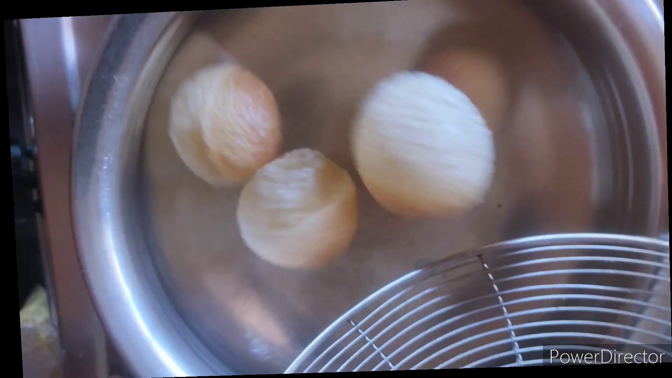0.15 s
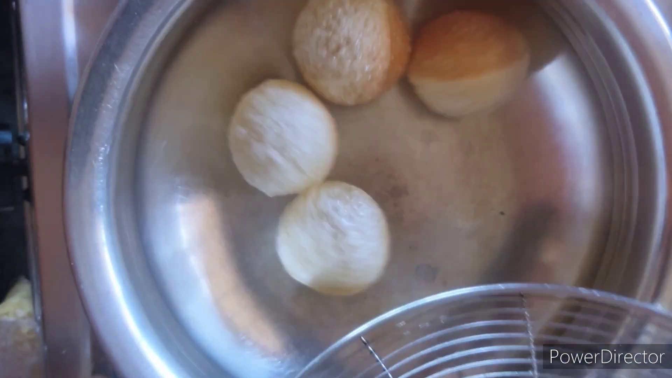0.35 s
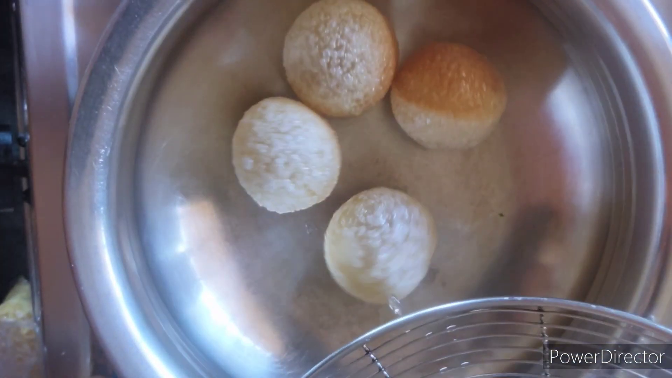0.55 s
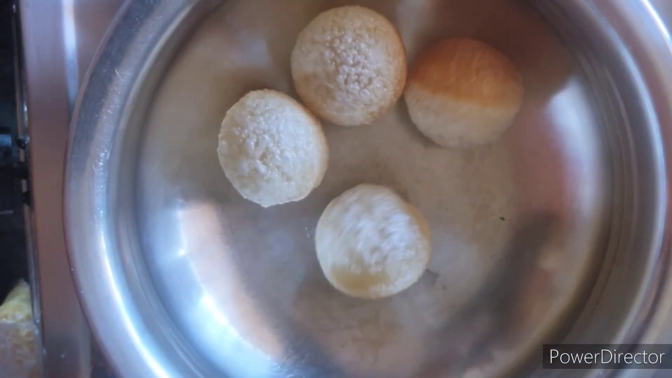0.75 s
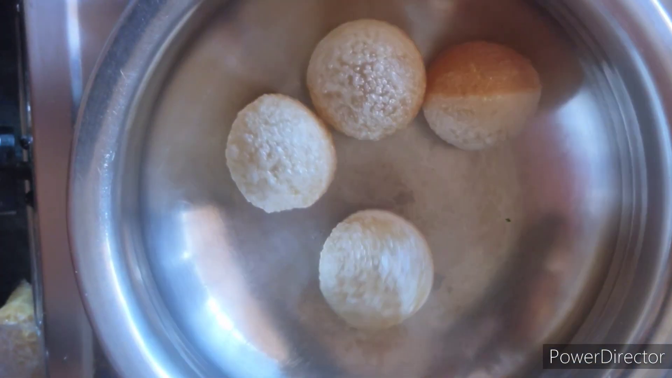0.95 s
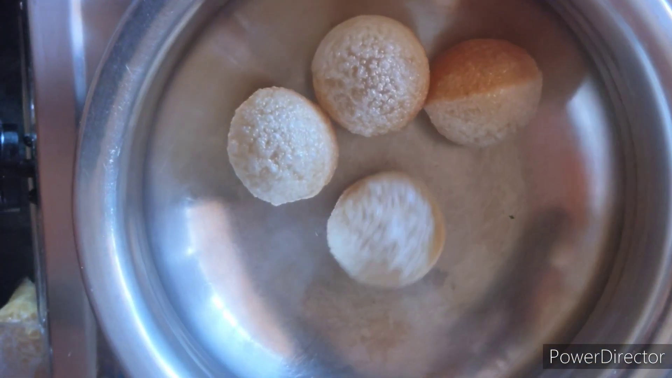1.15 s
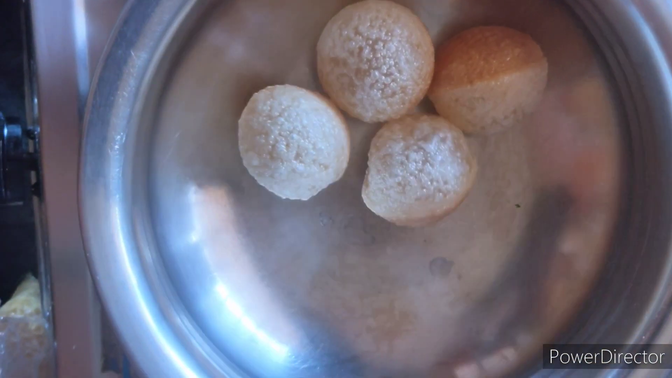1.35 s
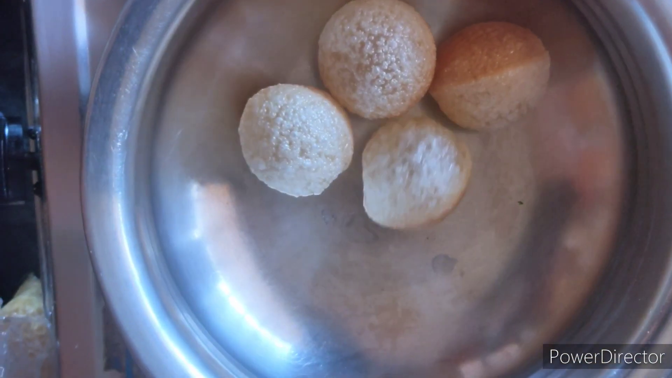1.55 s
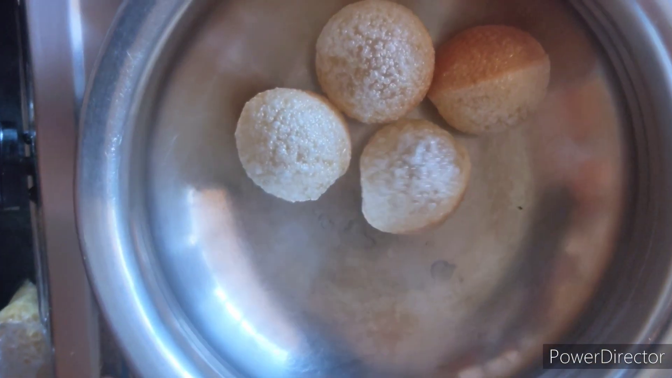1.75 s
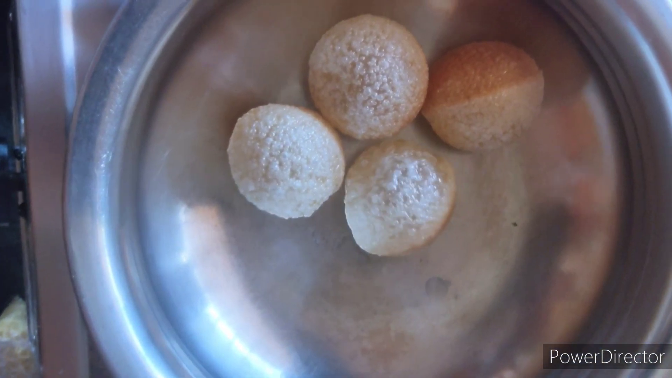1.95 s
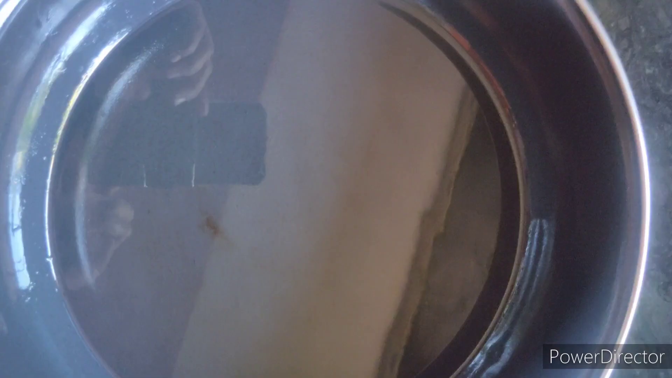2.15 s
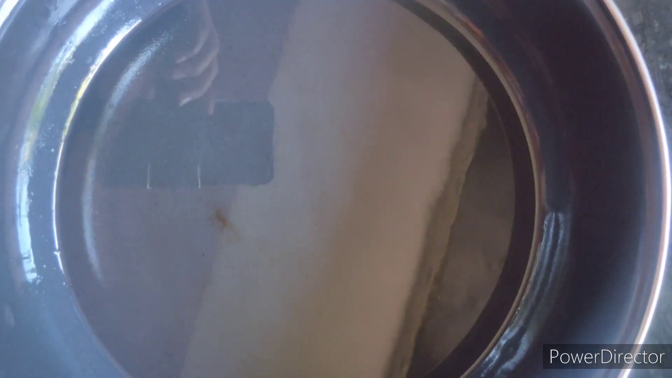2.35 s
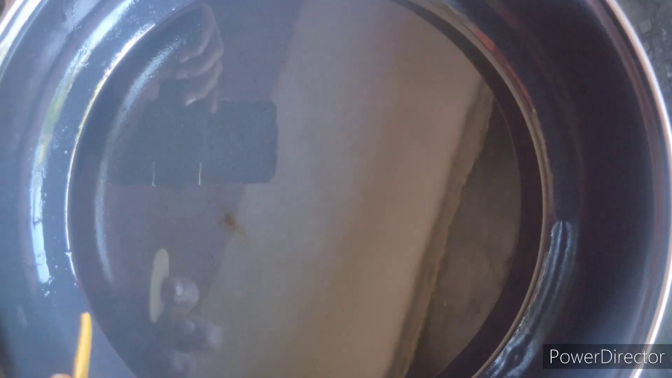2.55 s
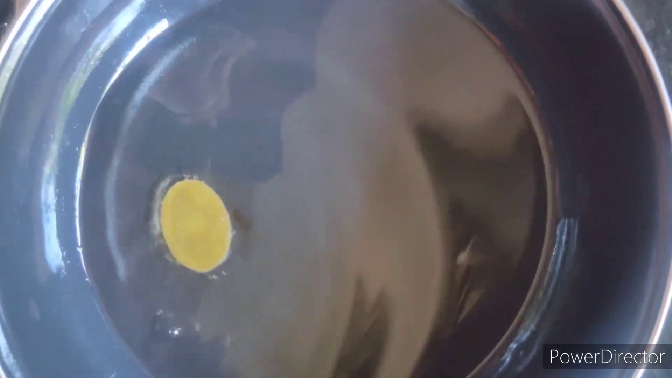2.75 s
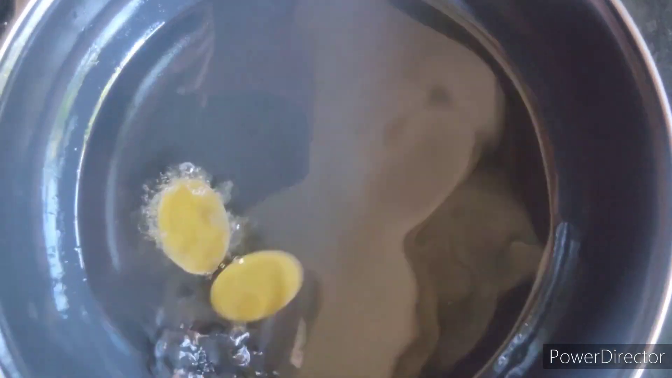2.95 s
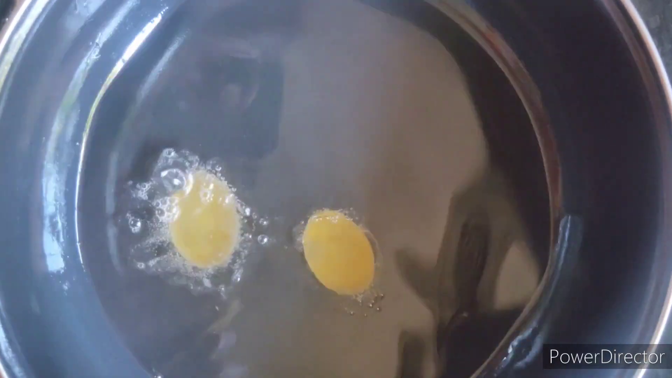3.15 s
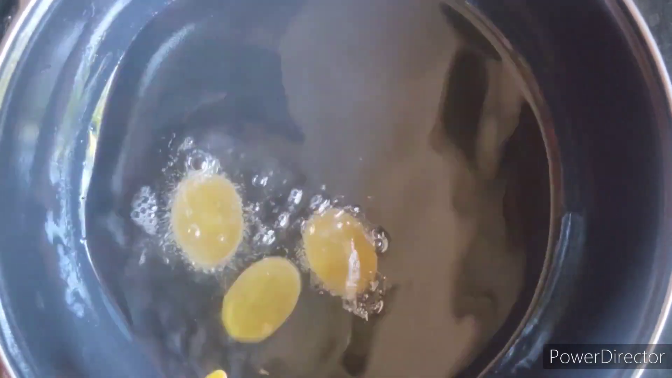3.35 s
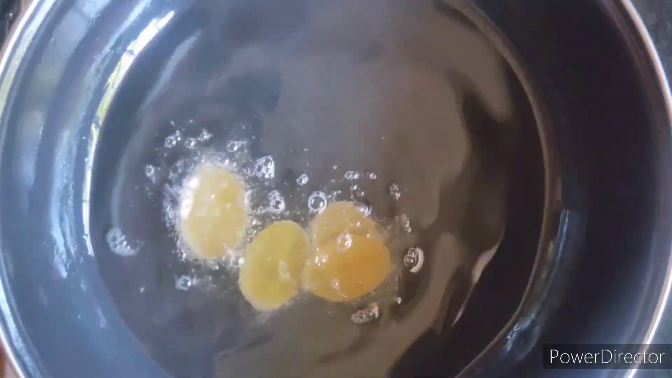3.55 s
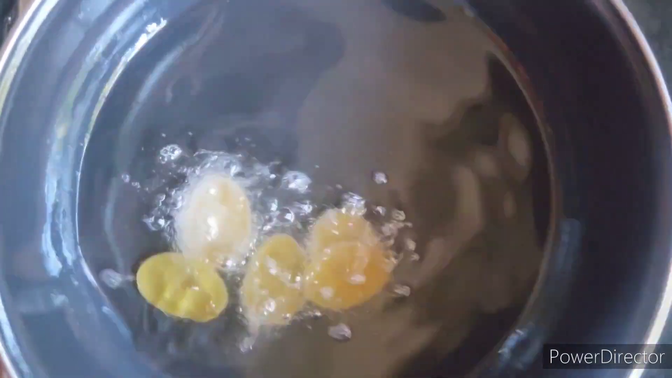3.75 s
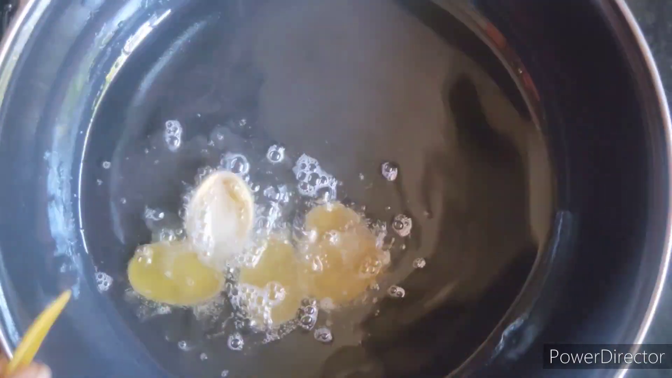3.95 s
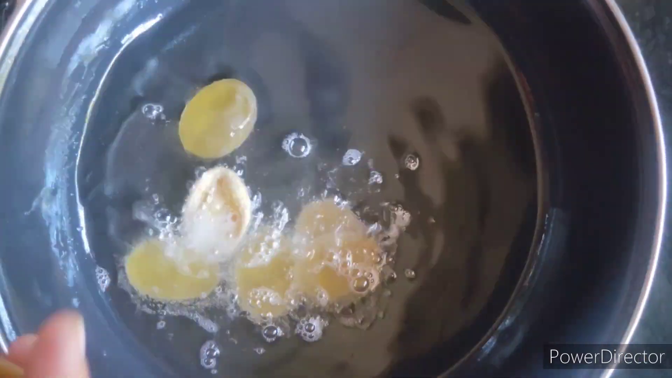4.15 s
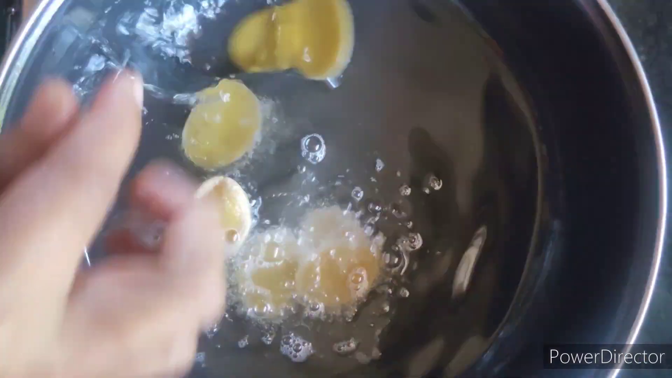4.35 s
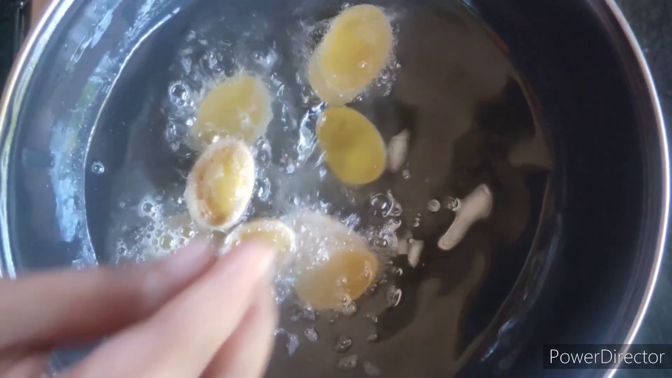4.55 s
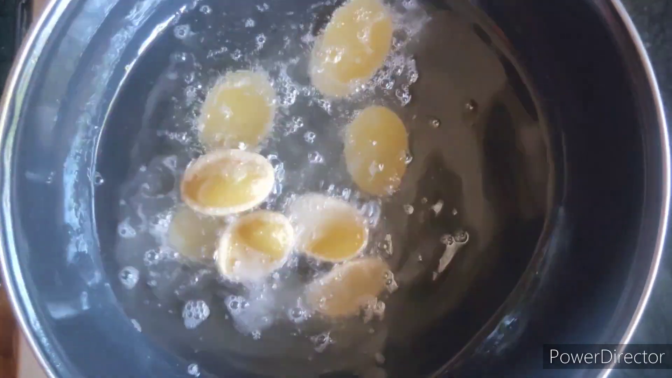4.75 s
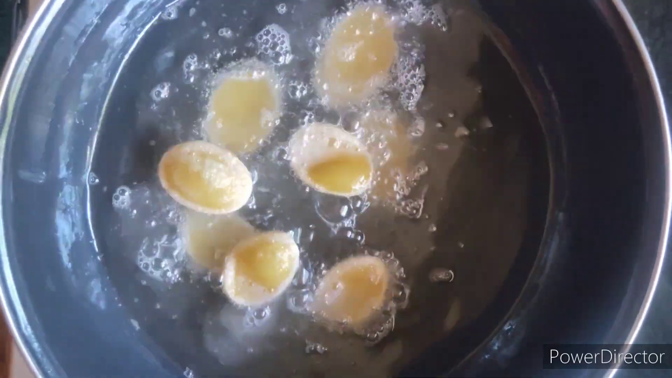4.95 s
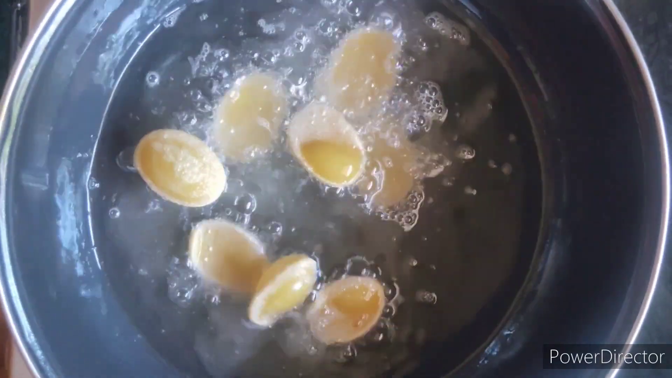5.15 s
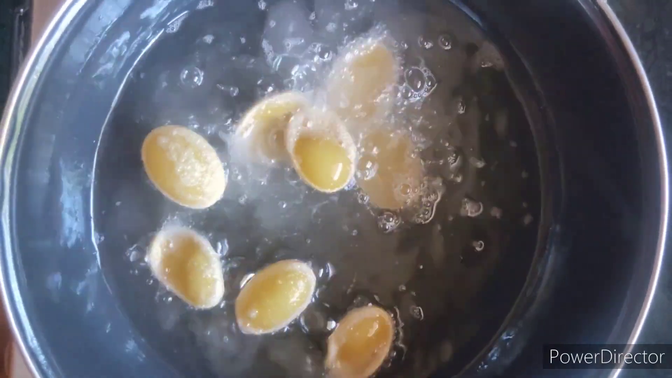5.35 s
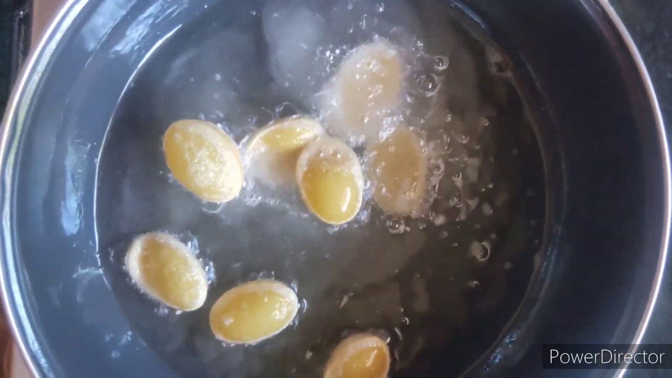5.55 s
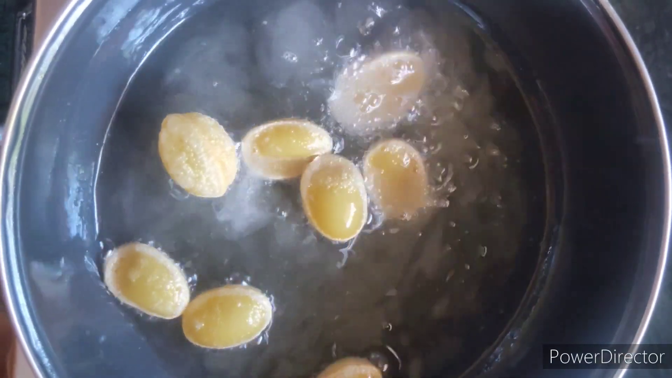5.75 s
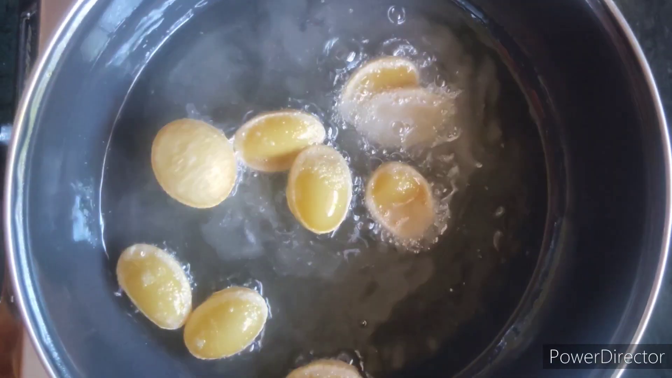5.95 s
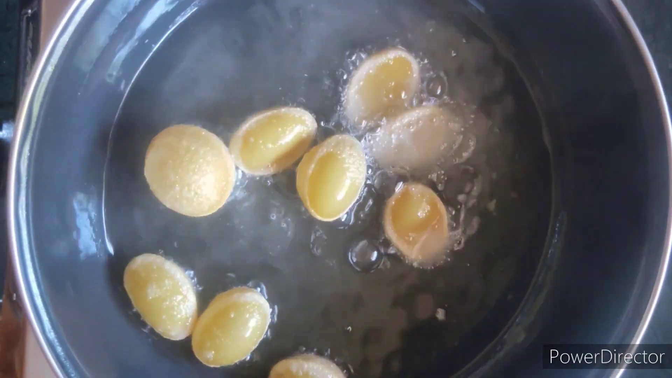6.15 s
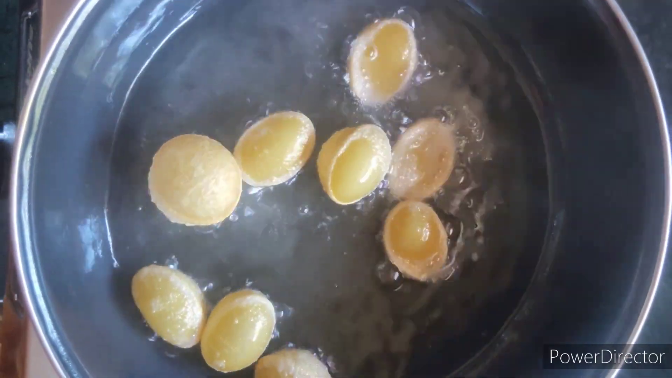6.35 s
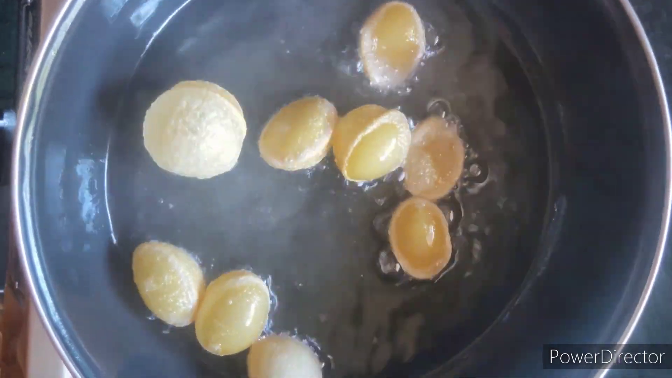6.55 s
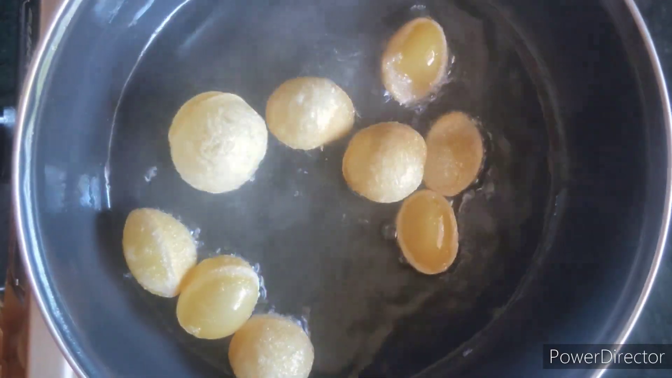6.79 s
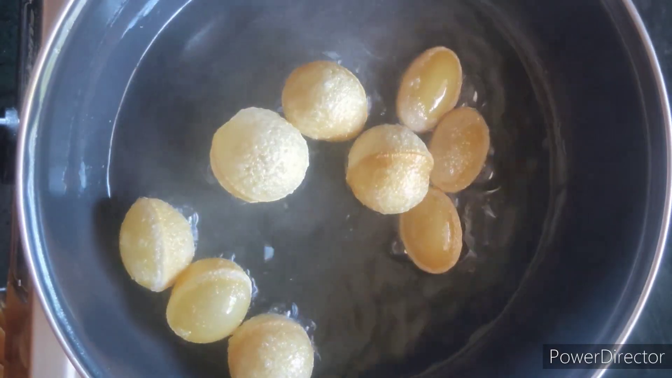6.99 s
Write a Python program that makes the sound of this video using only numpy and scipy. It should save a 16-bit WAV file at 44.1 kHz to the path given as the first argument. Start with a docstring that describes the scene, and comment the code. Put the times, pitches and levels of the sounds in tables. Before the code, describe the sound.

First, half a second of dull knocks and rattling as fried puffs roll into a metal bowl, fading to soft taps and faint tones. Then the scene cuts to a pot of oil: sharp splashes with short metallic ring, hiss and sparse spits, thickening into rapid loud crackles with a few soft low thumps. A bird outside chirps faintly about three times a second. Close kitchen pickup, faint noise floor.

```python
"""Two kitchen scenes one after the other. First crisp puffs tumble from a wire strainer into a steel bowl, heard dull:
knocks set the bowl ringing over rattling noise and a low rumble, then soft nudges and faint tones follow as noise patches.
Next a small bird, a gliding tone smeared by echoes, starts chirping outside at an even pace, and dough discs drop
into hot oil with bursts of noise and a ringing pot. The oil hisses and spits, and its loud crackles come ever more
densely. Soft low thumps join in later; a faint floor of noise runs throughout."""
import sys
import numpy as np
from scipy import signal
from scipy.fft import rfft, irfft
from scipy.io import wavfile
from scipy.ndimage import uniform_filter1d

SR = 44100
rng = np.random.default_rng(int(sys.argv[2]) if len(sys.argv) > 2 else 0)


def dump_mix(stems):
    """Bounce the given channels to the path in sys.argv[1] as a 16-bit WAV at rate SR."""
    frames = np.atleast_2d(stems).T  # one column per channel
    limited = np.clip(frames, -1, 1)  # hard clip at full scale
    pcm = np.round(limited * 32767).astype(np.int16)
    wavfile.write(sys.argv[1], SR, pcm)


N = 309582   # length of the sound [samples]
RIM_FROM_HZ = 1500   # bowl modes above this belong to the rim, the others to the bottom


def from_db(db):
    """Turn decibels into a gain."""
    return 10 ** (np.asarray(db) / 20)


def rms_one(x):
    """Scale a sound to an rms of 1."""
    return x / np.sqrt(np.mean(x ** 2) + 1e-20)


def in_time(rows):
    """Draw each curve of a table, sample by sample."""
    s, *columns = np.transpose(rows)
    return [np.interp(np.arange(N) / SR, s, c) for c in columns]


def at_hz(points, hz):
    """Read a spectrum at a pitch, on a log pitch axis."""
    point_hz, point_db = np.array(points)[:, 0], np.array(points)[:, 1]
    return np.interp(np.log(hz), np.log(point_hz), point_db)


def drift(rate):
    """Slow random wandering of rms 1, from noise low-passed near rate [Hz]."""
    r = np.exp(-80 * np.pi * rate / SR)   # one step spans 40 samples
    white = rng.standard_normal(N // 40 + 2002)
    slow = signal.lfilter([1], [1, -2 * r, r * r], white)[2000:]
    return np.interp(np.arange(N) / 40, np.arange(len(slow)), rms_one(slow))


def ring(clicks, hz, t60):
    """A resonance: each unit click starts a dying sine of height 1, down 60 dB after t60 [s]."""
    r, w = from_db(-60 / (t60 * SR)), 2 * np.pi * hz / SR
    return signal.lfilter([0, np.sin(w)], [1, -2 * r * np.cos(w), r * r], clicks + 1e-18)


def band(x, low, high, order=2):
    """Keep the pitches between low and high [Hz]."""
    edges = [max(low, 10), min(high, .45 * SR)]
    return signal.sosfilt(signal.butter(order, edges, "band", fs=SR, output="sos"), x)


def coloured(spectrum):
    """Steady noise of a given spectrum, rms 1."""
    hz = np.maximum(np.arange(N // 2 + 1) * SR / N, 10)
    return rms_one(irfft(rfft(rng.standard_normal(N)) * from_db(at_hz(spectrum, hz)), N))


def dying(length, rise, t60):
    """Envelope that swells over about rise [s] and falls 60 dB in t60 [s]."""
    t = np.arange(length) / SR
    return (1 - np.exp(-t / max(rise, 1e-4))) * from_db(-60 * t / max(t60, .003))


def add(out, s, sound):
    """Mix a sound in at s seconds."""
    i = round(s * SR)
    out[i:i + len(sound)] += sound[:N - i]


def patches(rows):
    """Narrow noise patches that swell and die: (time [s], level [dB], centre [Hz], width [Hz], rise [s], t60 [s])."""
    out = np.zeros(N)
    for s, db, hz, width_hz, rise, t60 in rows:
        patch = band(rng.standard_normal(SR), hz - width_hz / 2, hz + width_hz / 2, order=3)
        add(out, s, from_db(db) * rms_one(patch) * dying(SR, rise, t60))
    return out


def bursts(rows, snap_db, snap_t60, spray_db):
    """A sharp snap of noise, then a spray that dies sooner in the treble; three bands each."""
    out, length = np.zeros(N), SR // 5
    # (low [Hz], high [Hz], factor on every t60)
    layers = [(1166, 2260, 1.84), (2700, 5790, 0.8), (7900, 15200, 0.83)]
    white = rng.standard_normal((len(rows), length))
    white[:, 0] = 5   # the burst opens with one hard front
    noises = [rms_one(band(white, low, high, order=3)) for low, high, share in layers]
    for k, (s, db, *colour_db, t60) in enumerate(rows):
        for noise, rel_db, (low, high, share) in zip(noises, colour_db, layers):
            snap = from_db(snap_db) * dying(length, .0001, snap_t60 * share)
            spray = from_db(spray_db) * dying(length, 0.0049, t60 * share)
            add(out, s, from_db(db + rel_db) * noise[k] * (snap + spray))
    return out


def bowl():
    """Each knock rings the steel bottom and rim and adds a crack of noise; a rattle runs beneath."""
    # knocks: (time [s], level [dB], bottom ring [dB against it], rim ring [dB against it])
    knocks = [(.004, -35.5, -18.5, -25), (0.027, -38, -19.5, -19.5), (0.047, -29.5, -19.5, -20.5),
              (0.073, -35.5, -17, -18.5), (.102, -18, -19.5, -14.5), (.148, -18, -9, -20),
              (.208, -29.5, -6, -28), (0.23, -35, -19.5, -11), (0.27, -16.5, -16.5, -16),
              (.323, -26.5, -6.5, -29.5), (.348, -17.5, -14, -23), (.371, -36.5, -19.5, 3),
              (0.429, -24.5, -25, -12.5), (.468, -25, -29, -17.5), (.511, -48.5, -34, 7)]
    # ways the steel bowl rings: (pitch [Hz], relative level [dB], t60 before settling [s])
    bowl_modes = [(517, -15.5, 1.0), (807, -3.5, 0.081), (834, 4.5, 0.27), (900, -9.5, 0.07),
                  (987, -8, .15), (1142, -5.5, 0.16), (1330, -8, 0.89), (1339, -3, 1), (1754, -20.5, 1),
                  (1884, -10.5, 0.21), (2026, -14.5, 0.33), (2386, 0, .35), (2860, -14.5, .13),
                  (2924, -4, 0.25), (2990, -9, .13), (3233, -15, 0.13), (3670, -20.5, 0.24),
                  (3820, -12.5, 0.12), (3890, -9.5, .25), (4320, -15, 0.14), (4747, -6.5, 0.15),
                  (4850, -14, 0.29), (5560, -7, 0.16), (5720, -5.5, 0.22), (6220, -6, .067),
                  (6370, 0, 0.11), (6830, -10, 0.23), (6900, -11, .25), (7040, -12, 0.26)]
    # wires and crusts rattling: (pitch [Hz], relative level per Hz [dB])
    rattle_spectrum = [(41, -45.5), (70, -15), (641, -11.5), (816, -5), (1060, -23), (1350, -12),
                       (1620, -21.5), (6490, -21.5), (8600, -33), (11200, -66.5), (18900, -120)]
    # rattle level between the cracks: (time [s], level [dB])
    tumble_curve = [(0, -62), (.09, -59), (.12, -42), (.4, -45.5), (.52, -51.5), (.62, -66), (.7, -86),
                    (.85, -105)]
    # puffs lying in the bowl damp its ring; rolling ones make it flutter
    settle_s, settle_db_per_s, flutter_db = 0.37, -56, 3.0

    s, db, bottom_db, rim_db = np.transpose(knocks)
    at, ringing = np.round(s * SR).astype(int), np.zeros(SR * 2)
    uneven_db = rng.normal(0, 4.1, (len(at), len(bowl_modes)))
    for k, (hz, level_db, t60) in enumerate(bowl_modes):
        part_db = rim_db if hz > RIM_FROM_HZ else bottom_db
        clicks = np.zeros(len(ringing))
        clicks[at] = from_db(db + part_db + level_db - 5.5 + uneven_db[:, k])
        flutter = from_db(flutter_db * drift(18)[:len(ringing)])
        ringing += ring(clicks, hz, t60) * flutter
    settling_s = np.maximum(np.arange(len(ringing)) / SR - settle_s, 0)
    ringing *= from_db(settle_db_per_s * settling_s)

    crack = np.zeros(N)
    for start, knock_db in zip(s, db):
        sharp = from_db(knock_db - 9.5) * dying(SR // 4, 0.0024, 0.011)
        tail = from_db(knock_db - 15.5) * dying(SR // 4, .001, 0.087)
        add(crack, start, sharp + tail)
    rattle = coloured(rattle_spectrum) * (crack + from_db(in_time(tumble_curve)[0]))
    return np.pad(ringing, (0, N - len(ringing))) + rattle


def aftermath():
    """Puffs rolling to rest nudge the bowl, waking patches of close partials; blurred tones come and go."""
    # nudges: (time [s], bottom level [dB], rim level [dB])
    nudge_rows = [(.6, -62, -87), (0.87, -63, -63), (1.211, -60.5, -90.5), (1.399, -51.5, -77.5),
                  (1.764, -71, -95), (2.001, -70.5, -78)]
    # what a nudge wakes: (centre [Hz], width [Hz], relative level [dB], t60 [s])
    soft_ring = [(387, 230, -10.5, 0.32), (829, 74, 5.5, .3), (1327, 180, -13, 0.28), (2300, 280, -7, .25),
                 (2870, 260, -3, 0.45), (4330, 260, 6, 0.081), (4520, 900, 0, 0.36),
                 (5560, 190, -5.5, 0.57), (6060, 530, 3, 0.27), (6550, 140, -6.5, 0.4),
                 (7500, 1100, 3, 0.19)]
    # faint tones, some of them far off: (time [s], level [dB], pitch [Hz], rise [s], t60 [s])
    tones = [(.5, -62.5, 475, 0.014, 2.1), (0.599, -60.5, 2500, .01, 0.55), (.6, -64, 1620, .01, .3),
             (0.621, -68, 814, 0.028, 3.1), (0.911, -60.5, 1353, 0.028, 0.37),
             (.915, -53, 1550, 0.021, 0.27), (0.921, -59.5, 2370, 0.016, 0.41), (1.135, -64, 725, .01, 0.9),
             (1.388, -48, 1267, 0.051, 0.59), (1.401, -37.5, 1155, 0.18, 0.59),
             (1.411, -58, 1063, 0.069, 0.85), (1.52, -63, 2240, .012, 0.34),
             (1.688, -61, 2460, 0.013, 0.31), (1.7, -64.5, 2240, .01, 0.26),
             (1.709, -64, 1856, 0.013, 0.22), (1.93, -68.5, 2103, 0.011, 0.26)]
    nudge_rise_s = 0.0098
    tone_width_share = 0.068   # of its pitch

    uneven_db = rng.normal(0, 1.8, (len(nudge_rows), len(soft_ring)))
    rows = []
    for (s, bottom_db, rim_db), chance_db in zip(nudge_rows, uneven_db):
        for (hz, width_hz, db, t60), more_db in zip(soft_ring, chance_db):
            part_db = rim_db if hz > RIM_FROM_HZ else bottom_db
            rows.append((s, part_db + db + more_db, hz, width_hz, nudge_rise_s, t60))
    for s, db, hz, rise, t60 in tones:
        rows.append((s, db, hz, tone_width_share * hz, rise, t60))
    return patches(rows)


def drops():
    """Dough drops and spits splash as noise and ring the pot, each mode driven by its part of the blow."""
    # drops and spits: (time [s], level [dB], low, middle and top band [dB against it],
    # t60 of the splash before the band factors [s])
    drop_rows = [(2.716, -14.5, -28, -15, -6, 0.17), (2.723, -21.5, -54, -36, -2.5, 0.037),
                 (3.023, -18, -31.5, -19, -22, 0.27), (3.349, -28, -19.5, -9, -17.5, 0.27),
                 (3.537, -12, -29, -19.5, -16, 0.14), (3.829, -9, -32.5, -23.5, -12, 0.13),
                 (4.015, -45.5, -15, -4, -15.5, 0.048), (4.082, -49.5, -13.5, -2.5, -27, 0.34),
                 (4.159, -46.5, -8.5, 0, -23, 0.063), (4.198, -17, -32.5, -24, -11.5, 0.12),
                 (4.346, -40.5, -18.5, -7.5, -17, 0.21), (4.5, -43, -11.5, -4.5, -15, 0.3),
                 (4.658, -13.5, -21, -11.5, -13, 0.097)]
    # ways the pot rings: (pitch [Hz], relative level [dB], t60 [s])
    pot_modes = [(1276, -8.5, 0.1), (1553, -3, 0.065), (1744, -13, 0.23), (2080, 1.5, 0.068),
                 (3454, -18.5, 0.13), (4045, 5.5, 0.02), (4780, -5, 0.046), (6920, -9, 0.04),
                 (9250, -29.5, 0.073), (11045, 4, 0.02), (15200, 0, 0.046)]

    out = bursts(drop_rows, snap_db=-0.5, snap_t60=0.0094, spray_db=-14.0)
    uneven_db = rng.normal(0, 3.3, (len(drop_rows), len(pot_modes)))
    slosh = from_db(-19) * dying(SR // 4, 0.00014, 0.071)   # the oil keeps pushing the wall for a moment
    for (s, db, *colour_db, _), chance_db in zip(drop_rows, uneven_db):
        for (hz, level_db, t60), more_db in zip(pot_modes, chance_db):
            part_db = colour_db[int(hz > 2500) + int(hz > 7000)]   # low, middle or top
            gain = from_db(db + part_db + level_db + more_db - 7)
            push = slosh * rng.standard_normal(len(slosh))
            add(out, s, gain * ring(push, hz, t60))
    return out


def plops():
    """A short hollow note of narrow noise as the oil closes over a disc."""
    # plops: (time [s], level [dB])
    plop_rows = [(2.72, -51.5), (3.03, -62), (3.545, -59), (3.84, -61.5), (4.662, -43.5)]
    hz, width_hz, rise_s, t60_s = 772, 80, .006, 0.19
    return patches([(s, db, hz, width_hz, rise_s, t60_s) for s, db in plop_rows])


def pops():
    """Loud crackles of steam, as noise bursts; the low band follows the middle one loosely."""
    # crackles: (time [s], level [dB], middle band [dB against it])
    pop_rows = [(2.7984, -35.5, -31), (3.035, -23, -9), (3.0607, -41.5, 10), (3.2971, -37.5, -8),
                (3.4056, -37.5, -6), (3.6888, -37.5, -9.5), (4.2695, -30.5, -15), (4.471, -31.5, -8),
                (4.674, -23, -3.5), (4.895, -34.5, 1), (4.9395, -23, -12.5), (4.964, -37, 5.5),
                (5.001, -47, 12.5), (5.0752, -33.5, 3.5), (5.2315, -37.5, 5), (5.24, -28, -4.5),
                (5.2829, -25, -15), (5.3847, -24.5, -10.5), (5.4147, -23.5, -4.5), (5.4722, -26, -9),
                (5.5346, -24.5, -12), (5.6059, -22, -8.5), (5.653, -24, -8.5), (5.688, -35, -22),
                (5.7298, -30, -15), (5.7659, -23.5, -27), (5.782, -25.5, -17), (5.793, -18.5, -13),
                (5.7997, -23.5, -13.5), (5.831, -22, -24), (5.8843, -12, -18.5), (5.9207, -27, -30),
                (5.958, -22.5, -26), (5.9801, -28, 4.5), (5.9979, -30, -8), (6.0302, -22.5, -5.5),
                (6.0332, -20.5, -16), (6.0482, -21.5, -9.5), (6.0551, -25, -8), (6.0942, -23, -34),
                (6.121, -15.5, -19), (6.1886, -20.5, -14), (6.2243, -18, -9.5), (6.2701, -24.5, -5.5),
                (6.292, -20.5, -9), (6.3144, -21, -3), (6.3312, -19.5, -4), (6.3485, -22.5, 0),
                (6.3665, -23, -8), (6.3818, -19.5, -4), (6.4012, -22, -6), (6.421, -19, -11),
                (6.4409, -20.5, -11), (6.4777, -19.5, -11.5), (6.5116, -20, -14), (6.4998, -22, -15),
                (6.5913, -23, -18), (6.603, -21, -17), (6.645, -29, -28), (6.6754, -17, -13),
                (6.715, -26, -1), (6.7488, -20, -11.5), (6.7821, -12.5, -16), (6.803, -15.5, -11.5),
                (6.8176, -26, -16), (6.8456, -21, -32), (6.936, -29, -7), (6.9501, -24.5, -2.5),
                (6.9738, -19, -7), (6.9846, -19, -7.5)]
    top_db, t60_s = -2, 0.065   # top band against the level; t60 before the band factors
    under_middle_db = -12.5 + 2.5 * rng.standard_normal(len(pop_rows))
    rows = [(s, db, middle_db + under_db, middle_db, top_db, t60_s)
            for (s, db, middle_db), under_db in zip(pop_rows, under_middle_db)]
    return bursts(rows, snap_db=-2, snap_t60=0.0036, spray_db=-14)


def frying():
    """Random steam crackles with short sprays over a flickering hiss, in half-octave bands; air resonances."""
    # swell of the frying: (time [s], bright relative level [dB], lower relative level [dB])
    frying_curve = [(2.15, -115, -115), (2.2, -83.5, -95), (2.99, -72, -100), (3.46, -68.5, -74.5),
                    (3.77, -63.5, -76), (3.96, -69.5, -79.5), (4.32, -58.5, -65), (4.63, -62.5, -70),
                    (5.3, -54.5, -61.5), (6.2, -49.5, -58), (6.4, -37.5, -53.5), (6.58, -46, -53.5),
                    (7.02, -46.5, -62)]
    # colour of the sizzle: (pitch [Hz], relative level [dB])
    sizzle_spectrum = [(530, -57), (900, -43), (1260, -4), (4200, -3), (4740, -2), (5820, -3.5),
                       (9880, -10), (14900, -6), (16000, -8)]
    # air resonances above the oil: (pitch [Hz], level [dB], t60 [s])
    cavity_modes = [(1276, -38.5, 0.042), (2142, -32, 0.011), (4985, -27, 0.01)]

    bright_db, lower_db = in_time(frying_curve)
    sizes = from_db(5.0 * np.minimum(rng.exponential(1, N), 4))
    chance = 260 * from_db(4 * drift(15)) / SR   # around 260 crackles a second, in gusts
    clicks = sizes * (rng.random(N) < chance)
    edges = 850 * 2 ** np.arange(0, 4.6, .5)
    reach_db = rng.normal(0, 5.0, (2, N))
    white, together, out = rng.standard_normal((2, N)), drift(12), 0
    snap_decay, spray_decay = from_db(-60 / (.0025 * SR)), from_db(-60 / (.03 * SR))
    for k, (low, high) in enumerate(zip(edges, edges[1:])):
        hz = np.sqrt(low * high)
        # every crackle has its own colour
        tilt = from_db(reach_db[0] * np.log2(hz / 5000) / 2 + reach_db[1] * (-1) ** (k // 2))
        snap = signal.lfilter([1], [1, -snap_decay], clicks * tilt)
        spray = from_db(-16) * signal.lfilter([1], [1, -spray_decay], clicks * tilt)
        flicker = from_db(2.3 * together + 2.5 * drift(18) - 7.5)
        level_db = lower_db if hz < 4200 else bright_db
        grainy = band((rms_one(snap + spray) + flicker) * white[k % 2], low, high)
        out = out + from_db(at_hz(sizzle_spectrum, hz) + level_db) * grainy
    sizzle = from_db(8.0) * out + pops()
    return sizzle + sum(from_db(db) * ring(sizzle, hz, t60) for hz, db, t60 in cavity_modes)


def wisps():
    """Short broad puffs of fine bright fizz whose bands flicker apart into patches."""
    # wisps: (time [s], level before the flicker [dB], centre [Hz], t60 [s])
    wisp_rows = [(2.25, -56, 10900, 0.28), (2.375, -53.5, 12400, 0.37), (2.511, -53, 11200, 0.24),
                 (2.6, -55, 9500, 0.16), (2.86, -62.5, 12400, 1), (3.1, -60, 12800, 0.4),
                 (3.149, -58.5, 10800, 0.96), (3.275, -49, 6050, 0.14), (3.401, -69, 12000, .19),
                 (3.618, -60, 12500, 1), (3.689, -49, 6900, 0.13), (3.89, -62.5, 9700, .14)]
    width_hz, rise_s, patchy_db = 7900, 0.021, 6
    fizz = patches([(s, db, hz, width_hz, rise_s, t60) for s, db, hz, t60 in wisp_rows])
    edges = np.geomspace(2500, 17000, num=12)
    return sum(band(fizz, low, high) * from_db(patchy_db * drift(35)) for low, high in zip(edges, edges[1:]))


def bird():
    """A rough chirp that falls onto a steady pitch, smeared by dense dying echoes."""
    # chirps: time [s]
    chirp_times = [2.454, 2.773, 3.162, 3.487, 3.812, 4.15, 4.487, 4.823, 5.164, 5.51, 5.857, 6.201]
    # a fainter chirp opens the series: (time [s], level before the band-pass [dB])
    first_chirp = (2.192, -74)
    start_db, fade_db_per_s = -55, -.5   # level before the band-pass

    out, t = np.zeros(N), np.arange(round(.06 * SR)) / SR
    wobble_hz = 270 * np.sin(2 * np.pi * 250 * t) * np.exp(-t / .05)
    glide_hz = 4780 + 650 * np.exp(-t / .008) + wobble_hz
    call = np.sin(2 * np.pi * np.cumsum(glide_hz) / SR) * dying(len(t), .001, .3)
    call *= 1 + .7 * np.sign(np.sin(2 * np.pi * 240 * t))   # pulsed, grainy voice
    later = [(s, start_db + fade_db_per_s * (s - chirp_times[0])) for s in chirp_times]
    for s, db in [first_chirp] + later:
        echoes = rng.standard_normal(SR // 3) * dying(SR // 3, 0.00045, 0.24)
        add(out, s, from_db(db) * rms_one(signal.fftconvolve(call, echoes)))
    return band(out, 4250, 5230, order=3)


def thumps():
    """Soft low thumps near the microphone: noise patches with a hollow body and a deep push."""
    # thumps: (time [s], level [dB], t60 [s])
    thump_rows = [(3.955, -61, 0.18), (4.3, -70, 0.21), (6.36, -47, 0.063), (6.8, -59.5, 0.072),
                  (6.97, -55, 0.25)]
    # (centre [Hz], width [Hz], relative level [dB])
    parts = [(470, 340, 0), (59.5, 87, -9.5)]
    return patches([(s, db + part_db, hz, width_hz, 0.011, t60)
                    for s, db, t60 in thump_rows for hz, width_hz, part_db in parts])


def rumble():
    """Low hollow rumble under the bowl: coloured noise that follows a level curve."""
    # (time [s], level [dB])
    rumble_curve = [(0.0, -64.5), (0.12, -57), (2.13, -89.5), (2.17, -120)]
    # (pitch [Hz], relative level per Hz [dB])
    rumble_spectrum = [(15, -50.5), (25, -21), (38, -28), (81, -3), (130, 5.5), (356, -20.5), (400, -9.5),
                       (520, -37), (880, -120)]
    return from_db(in_time(rumble_curve)[0]) * coloured(rumble_spectrum)


def faint_hiss():
    """Faint steady treble hiss: a band of noise."""
    return from_db(-94.5) * rms_one(band(rng.standard_normal(N), 5500, 7500))


def noise_floor():
    """Faint coloured noise whose level wanders a little."""
    # (pitch [Hz], relative level per Hz [dB])
    floor_spectrum = [(15, -51.5), (25, -19), (530, -11.5), (786, -20), (3280, -26.5), (4860, -31),
                      (6860, -29.5), (9000, -36.5), (11700, -46), (19800, -120)]
    return from_db(-85 + 2.0 * drift(14)) * coloured(floor_spectrum)


def suppress(x, gate_db):
    """Noise suppressor: bands whose recent power lies near the noise level are turned down, leaving patches."""
    spectra = signal.stft(x, nperseg=512, noverlap=384)[2]
    power = uniform_filter1d(np.abs(spectra) ** 2, size=9, axis=0)   # blur across pitch
    power = uniform_filter1d(power, size=5, axis=1)   # blur across time
    lagging = signal.lfilter([.25], [1, -.75], power, axis=1)
    power = np.maximum(power, lagging)   # opens fast, closes slowly
    above = power / (from_db(gate_db) ** 2 / 256)
    gain = np.clip(1 - 1 / above, from_db(-34), 1) ** 0.57
    return signal.istft(spectra * gain, nperseg=512, noverlap=384)[1][:N]


def scene():
    """The dull bowl scene, then the bright frying scene, over one faint floor."""
    scene_change_s, dull_cut_hz = 2.15, 9330
    mic_peak_hz, mic_peak_db = 14200, -5.5

    clatter = suppress(band(bowl() + aftermath(), 90, 17000), gate_db=-79)
    dull_filter = signal.cheby2(10, 60, dull_cut_hz, fs=SR, output="sos")
    dull = signal.sosfilt(dull_filter, clatter + rumble() + faint_hiss())
    dull = dull * (np.arange(N) < scene_change_s * SR)

    oil = drops() + plops() + frying() + wisps()
    # treble lift of the microphone port
    lift = band(oil, mic_peak_hz - 3000, mic_peak_hz + 3000, order=1)
    oil = oil + from_db(mic_peak_db) * lift
    bright = suppress(band(oil + bird(), 440, 23000, order=3), gate_db=-63.5)
    return (dull + bright + thumps() + noise_floor())[None]


def record(dry):
    """A steep low-pass cuts the top, from 16700 Hz up."""
    return signal.sosfilt(signal.cheby2(12, 70, 16700, fs=SR, output="sos"), dry)


dry = scene()
out = record(dry)
dump_mix(out)
```